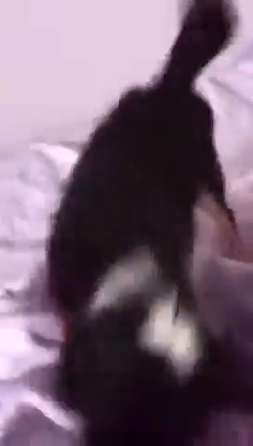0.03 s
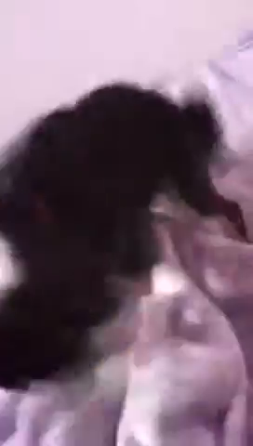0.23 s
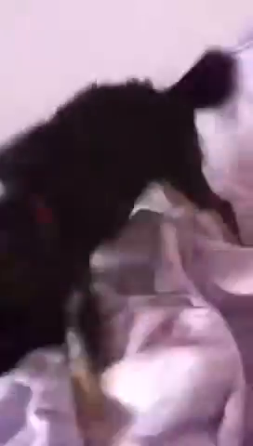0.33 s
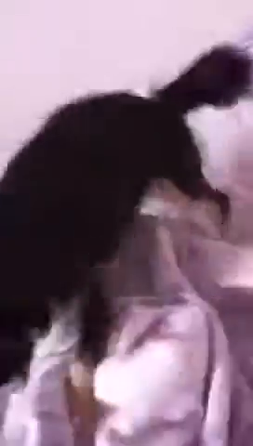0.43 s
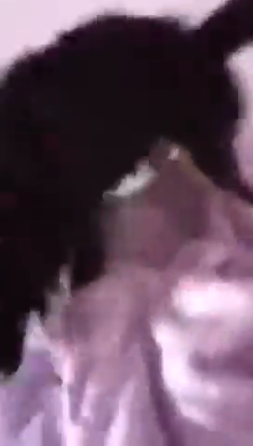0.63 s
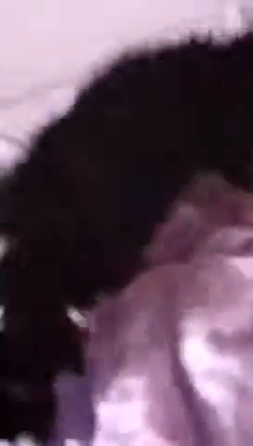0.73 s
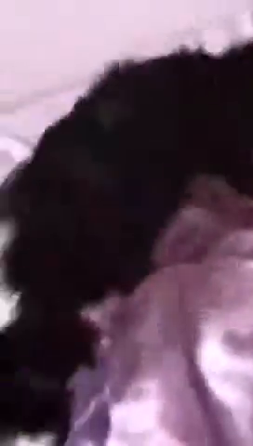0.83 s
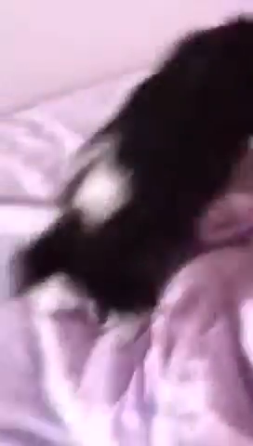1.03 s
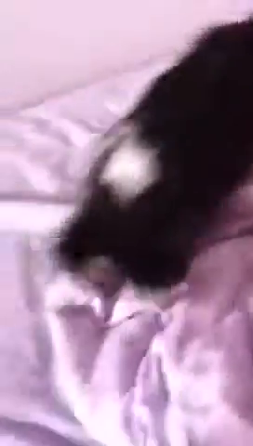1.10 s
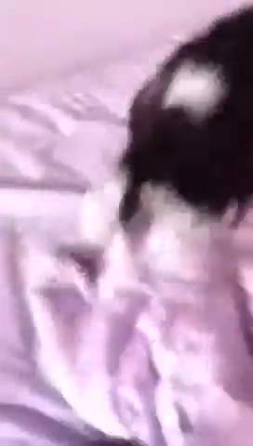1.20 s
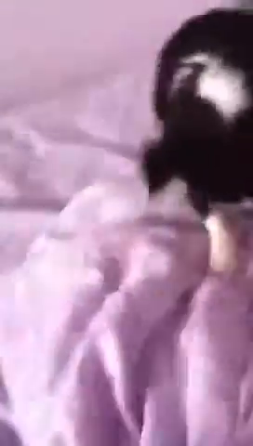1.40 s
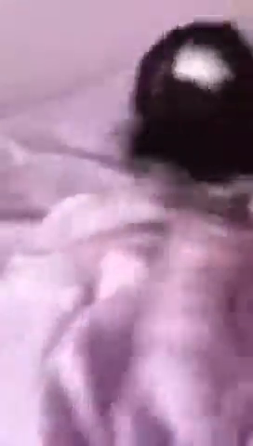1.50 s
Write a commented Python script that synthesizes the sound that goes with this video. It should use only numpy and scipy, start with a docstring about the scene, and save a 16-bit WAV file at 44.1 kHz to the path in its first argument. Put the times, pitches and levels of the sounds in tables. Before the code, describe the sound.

A dog's metal collar tag clinks and jingles lightly as paws pad on rustling bedding.

```python
"""Small dog on a duvet

A small dog steps about on a duvet, close by, over the faint hiss and hum of a quiet bedroom. Its metal collar
tags strike the ring and vibrate in their modes: one sharp clink among light jingles. Paws thud softly in the
padding; the cloth slides and swishes by friction and snaps as folds buckle."""
import sys
import numpy as np
from scipy import signal
from scipy.fft import rfft, irfft, next_fast_len
from scipy.io import wavfile

SR = 44100
rng = np.random.default_rng(int(sys.argv[2]) if len(sys.argv) > 2 else 0)


def put_to_file(sound):
    """Save the sound as 16-bit audio at rate SR, in the file named by the first command-line argument."""
    columns = np.atleast_2d(sound).T  # one column per channel
    safe = np.clip(columns, -1, 1)
    whole_steps = np.round(safe * 32767)
    wavfile.write(sys.argv[1], SR, whole_steps.astype(np.int16))


N = 68355

# Spectrum of the room's hiss: frequency_hz, relative_db
HISS_SPECTRUM = [(25, -15), (60, -10.5), (110, -0.5), (185, 8.5), (260, 2.5), (500, -5), (1000, -10),
                 (2500, -13.5), (6000, -14), (12000, -19), (15500, -14.5)]
HISS_DB, HUM_HZ, HUM_DB = -66, 185.2, -77

# Envelope of the duvet sliding under the dog: time_s, level_db
SLIDE_ENVELOPE = [(0, -63.5), (0.08, -70.5), (0.22, -68.5), (0.3, -63), (0.36, -63), (0.47, -71.5),
                  (0.57, -64.5), (0.6, -65.5), (0.62, -57.5), (0.65, -66), (0.69, -63), (0.78, -68.5),
                  (0.85, -67.5), (0.97, -75.5), (1.07, -66.5), (1.19, -64), (1.34, -69.5), (1.49, -61.5),
                  (1.53, -63)]
# Spectrum of sliding cloth: frequency_hz, relative_db
SLIDE_SPECTRUM = [(60, -28), (180, -4), (350, 0.5), (650, -2), (900, -3.5), (1350, -1), (2000, -7.5),
                  (4000, -11), (8000, -13.5), (15000, -17)]
SLIPS_PER_S, SLIP_POWER_SHARE = 2000, 0.39

# Impacts of tag on ring: start_s, top_modes_db, middle_modes_db, low_modes_db, click_db
TAG_STRIKES = [(0.002, -53, -78, -69, -44), (0.017, -57, -68, -82, -54), (0.028, -48.5, -81, -81, -59),
               (0.135, -63, -78, -72, -49), (0.158, -57, -83, -72, -63), (0.1789, -43, -59, -81, -38),
               (0.208, -19.5, -47.5, -51, -15), (0.2134, -40, -44.5, -56.5, -19),
               (0.236, -46, -59, -57, -46), (0.528, -59, -85, -74, -72), (0.556, -66.5, -71, -72, -65),
               (0.572, -54, -69, -75, -66), (0.589, -56, -72, -74, -63), (0.6233, -40, -61, -55, -28.5),
               (0.631, -55, -84, -56, -37), (0.653, -43.5, -59, -61.5, -58), (0.847, -64, -75, -80, -49),
               (0.863, -56, -73, -72, -64), (0.893, -59, -71, -72, -57), (0.946, -56, -62.5, -69, -42),
               (0.966, -49.5, -79, -66.5, -46), (1.003, -56.5, -74, -73, -54), (1.01, -48, -68, -65, -61),
               (1.020, -52, -72, -68, -66), (1.375, -63, -63, -71, -37), (1.4045, -44, -77, -63, -58),
               (1.517, -51, -74, -70, -54), (1.524, -59, -74, -97, -60)]
# Normal modes of the two metal tags on the collar, in three pitch groups: pitch_hz, relative_db, t60_s
TAG_TOP_MODES = [(14770, 1, 0.058), (14800, -14.5, 0.062), (13000, -27, 0.048)]
TAG_MIDDLE_MODES = [(10326, 2.5, 0.071), (10350, -8, 0.21)]
TAG_LOW_MODES = [(8333, 1.5, 0.078), (8200, -6.5, 0.068), (9520, -9.5, 0.15), (7600, -5, 0.052)]
# Spectrum of metal contact: frequency_hz, relative_db
CONTACT_SPECTRUM = [(100, -28), (800, -20.5), (2000, -9.5), (7000, -1), (12000, 3.5), (14500, -0.5),
                    (16000, -5.5)]
MODE_ATTACK_S, CHATTER_RELATIVE_DB, CHATTER_T60_S = 0.00056, -26, 0.035
SCRAPE_DB, SCRAPE_T60_S = -67.5, 0.1

# Paws sinking into the duvet: start_s, level_db, t60_s
PAW_STEPS = [(0.104, -48.5, 0.15), (0.140, -54.5, 0.16), (0.238, -55, 0.11), (0.269, -47.5, 0.11),
             (0.280, -48.5, 0.081), (0.319, -53, .1), (0.337, -57, 0.14), (0.493, -61.5, 0.11),
             (0.617, -44.5, 0.073), (0.629, -46, 0.058), (0.676, -53, 0.096), (0.765, -55.5, 0.043),
             (0.81, -73, 0.11), (0.89, -71, 0.09), (1.019, -59.5, 0.11), (1.242, -56, 0.09),
             (1.415, -60, 0.15), (1.445, -47, 0.084), (1.480, -54, 0.09), (1.493, -53, 0.063)]
# Spectrum of crushed filling: frequency_hz, relative_db
CRUSH_SPECTRUM = [(30, -20), (70, -38), (120, -6), (190, 1), (280, 1.5), (420, -7), (700, -13.5),
                  (1300, -34), (4000, -60)]
STEP_ATTACK_S, BOUNCE_HZ, BOUNCE_LOG_SPREAD = 0.0047, 212.8, 0.1206
BOUNCE_RELATIVE_DB, CRUSH_RELATIVE_DB = -4, -3

# Quick strokes of cloth: peak_s, level_db, rise_s, fall_s, rasp_hz
CLOTH_STROKES = [(0.285, -64, .018, .03, 2240), (0.619, -52.5, 0.0097, 0.0089, 2440),
                 (0.72, -62.5, 0.02, 0.024, 2660), (0.82, -71, 0.031, 0.021, 2130),
                 (1.442, -51, .007, 0.0058, 2500), (1.465, -61.5, 0.013, 0.02, 2630),
                 (1.548, -53, 0.0035, 0.0074, 2280)]
# Spectrum of a swish: frequency_hz, relative_db
SWISH_SPECTRUM = [(60, -40), (150, -6), (300, -6), (1200, -4.5), (1900, -6.5), (3000, -5.5), (5500, -8),
                  (8000, -13), (15000, -23)]
RASP_RELATIVE_DB, RASP_HALF_WIDTH_HZ = -0.5, 174

# Folds snapping over: start_s, peak_db, upper_corner_hz
FOLD_SNAPS = [(0.3363, -43.5, 980), (0.358, -52.5, 990), (0.621, -34.5, 1430), (0.673, -48.5, 1200),
              (1.4452, -37, 4040), (1.452, -39.5, 3500), (1.489, -51, 1500), (1.4969, -42.5, 1700),
              (1.546, -42, 950)]
FOLD_LOW_HZ, CRUMPLE_RELATIVE_DB, CRUMPLE_T60_S = 250, -23.5, 0.031

# Reverberation time of the bedroom: frequency_hz, t60_s
ROOM_DECAY = [(200, 0.59), (2000, .28), (8000, 0.32), (15000, 0.18)]
TAG_ROOM_DB, BEDDING_ROOM_DB, ROOM_DELAY_S = -10, -12.5, 0.004
BAND_LIMIT_HZ = 15900


def amp(db):
    """Convert decibels to an amplitude ratio."""
    return 10 ** (np.asarray(db) / 20)


def unit_rms(x):
    """Normalise to an rms of 1."""
    return x / np.sqrt(np.mean(x ** 2) + 1e-20)


def curve_at(points, hz):
    """Interpolate a table on a logarithmic frequency axis."""
    frequencies, values = np.transpose(points)
    return np.interp(np.log(hz + 1), np.log(frequencies + 1), values)


def filtered(x, response):
    """Linear filtering multiplies the spectrum by a frequency response."""
    size = next_fast_len(N + SR // 2)
    return irfft(rfft(x, size) * response(np.fft.rfftfreq(size, 1 / SR)), size)[:N]


def coloured(x, spectrum):
    """Spectral shaping that conserves the power of white noise."""
    return filtered(x, lambda hz: unit_rms(amp(curve_at(spectrum, hz))))


def noise(spectrum):
    """Coloured Gaussian noise with an rms near 1."""
    return coloured(rng.standard_normal(N), spectrum)


def since(start_s):
    """Seconds elapsed since start_s, zero before it."""
    return np.maximum(np.arange(N) / SR - start_s, 0)


def decay(start_s, t60_s):
    """Exponential damping from start_s: a fall of 60 dB in t60_s."""
    t = since(start_s)
    return (t > 0) * np.exp(-np.log(1000) * t / t60_s)


def room_hiss():
    """Superposition of steady broadband noise and a faint low pure tone."""
    hum = np.sqrt(2) * np.sin(2 * np.pi * HUM_HZ * since(0))
    return amp(HISS_DB) * noise(HISS_SPECTRUM) + amp(HUM_DB) * hum


def cloth_friction(spectrum):
    """Stick-slip friction: fibres make tiny slips of random size over a smooth rub."""
    slips = (rng.random(N) < SLIPS_PER_S / SR) * rng.standard_normal(N)
    rub = np.sqrt(1 - SLIP_POWER_SHARE) * rng.standard_normal(N)
    return coloured(np.sqrt(SLIP_POWER_SHARE) * unit_rms(slips) + rub, spectrum)


def duvet_slide():
    """Sliding friction under the dog makes a continuous noise that swells and fades."""
    level_db = np.interp(since(0), *np.transpose(SLIDE_ENVELOPE))
    return amp(level_db) * cloth_friction(SLIDE_SPECTRUM)


def collar_tag():
    """Impacts click, chatter and excite damped normal modes; where each lands sets their balance."""
    ringing, clicks, contact_envelope = np.zeros(N + SR), np.zeros(N), np.zeros(N)
    t = np.arange(SR // 2) / SR
    attack = 1 - np.exp(-t / MODE_ATTACK_S)
    for start_s, *group_levels, click_db in TAG_STRIKES:
        start = round(start_s * SR)
        for modes, group_db in zip((TAG_TOP_MODES, TAG_MIDDLE_MODES, TAG_LOW_MODES), group_levels):
            for pitch_hz, relative_db, t60_s in modes:
                swing = np.sqrt(2) * np.sin(2 * np.pi * (pitch_hz * t + rng.random()))
                envelope = attack * np.exp(-np.log(1000) * t / t60_s)
                ringing[start:start + len(t)] += amp(group_db + relative_db + rng.normal()) * envelope * swing
        clicks[start] += amp(click_db)
        contact_envelope += amp(click_db + CHATTER_RELATIVE_DB) * decay(start_s, CHATTER_T60_S)
        # The ring scrapes in the tag's hole.
        contact_envelope += amp(SCRAPE_DB) * decay(start_s, SCRAPE_T60_S)
    contact = clicks + contact_envelope * rng.standard_normal(N)
    return ringing[:N] + coloured(contact, CONTACT_SPECTRUM)


def paw_thuds():
    """The padding is a damped oscillator: each paw starts a low bounce and crushes the filling."""
    out = np.zeros(N)
    crush = amp(CRUSH_RELATIVE_DB) * noise(CRUSH_SPECTRUM)
    for start_s, level_db, t60_s in PAW_STEPS:
        t = since(start_s)
        pitch_hz = BOUNCE_HZ * np.exp(BOUNCE_LOG_SPREAD * rng.normal())
        bounce = amp(BOUNCE_RELATIVE_DB) * np.sqrt(2) * np.sin(2 * np.pi * pitch_hz * t)
        envelope = decay(start_s, t60_s) * (1 - np.exp(-t / STEP_ATTACK_S))
        out += amp(level_db) * envelope * (bounce + crush)
    return out


def cloth_swishes():
    """Friction in a quick stroke gives a broadband swish and a narrowband rasp of the weave."""
    out, t = np.zeros(N), since(0)
    for peak_s, level_db, rise_s, fall_s, rasp_hz in CLOTH_STROKES:
        white = rng.standard_normal(N)
        rasp = filtered(white, lambda hz: 1 / (1 + ((hz - rasp_hz) / RASP_HALF_WIDTH_HZ) ** 2))
        swish = cloth_friction(SWISH_SPECTRUM) + amp(RASP_RELATIVE_DB) * unit_rms(rasp)
        envelope = np.exp(-np.maximum((peak_s - t) / rise_s, (t - peak_s) / fall_s))
        out += amp(level_db) * envelope * swish
    return out


def fold_snaps():
    """Buckling: a crease gives way with an impulse, heard as a dull snap, and a short crumple."""
    out = np.zeros(N)
    for start_s, peak_db, upper_corner_hz in FOLD_SNAPS:
        band = signal.butter(2, [FOLD_LOW_HZ, upper_corner_hz], 'band', fs=SR, output='sos')
        force = amp(CRUMPLE_RELATIVE_DB) * decay(start_s, CRUMPLE_T60_S) * rng.standard_normal(N)
        force[round(start_s * SR)] += 1
        snap = signal.sosfilt(band, force)
        out += amp(peak_db) * snap / np.abs(snap).max()
    return out


def reverberation(x):
    """Diffuse reflections: convolution with a delayed noise tail, each band dying at its own rate."""
    hz, t, bands = signal.stft(rng.standard_normal(SR // 2), SR, nperseg=256)
    damping = np.exp(-np.log(1000) * t / curve_at(ROOM_DECAY, hz)[:, None])
    tail = signal.istft(bands * damping, SR, nperseg=256)[1]
    reflections = signal.fftconvolve(x, tail / np.linalg.norm(tail))[:N]
    return filtered(reflections, lambda f: np.exp(-2j * np.pi * f * ROOM_DELAY_S))


def scene():
    """Superposition of the direct sound of tag and bedding, their reflections and the hiss."""
    tag = collar_tag()
    bedding = paw_thuds() + fold_snaps() + duvet_slide() + cloth_swishes()
    reflections = amp(TAG_ROOM_DB) * reverberation(tag) + amp(BEDDING_ROOM_DB) * reverberation(bedding)
    return (tag + bedding + reflections + room_hiss())[None]


def record(dry):
    """An ideal low-pass filter passes nothing above the band limit."""
    return filtered(dry[0], lambda hz: hz < BAND_LIMIT_HZ)[None]


dry = scene()
out = record(dry)
put_to_file(out)
```